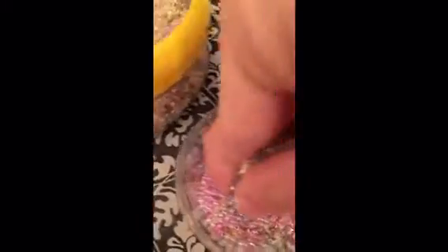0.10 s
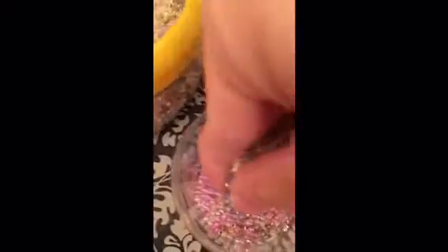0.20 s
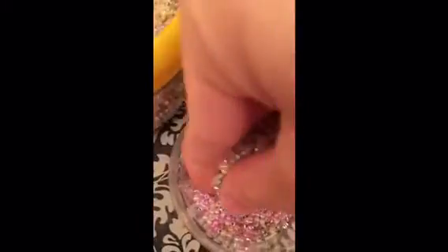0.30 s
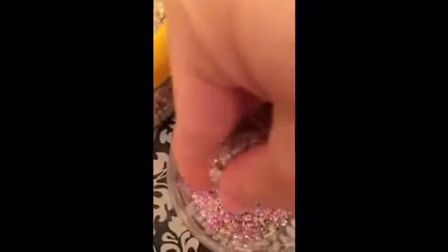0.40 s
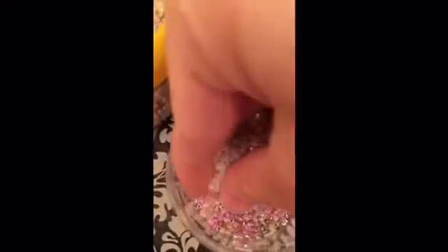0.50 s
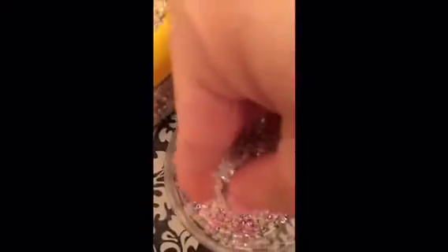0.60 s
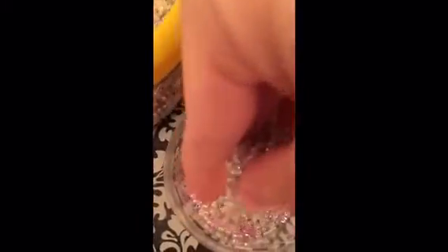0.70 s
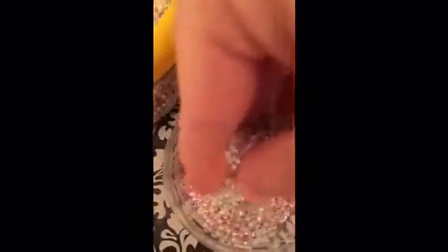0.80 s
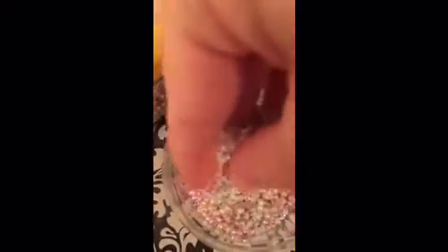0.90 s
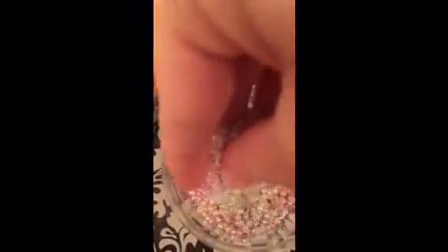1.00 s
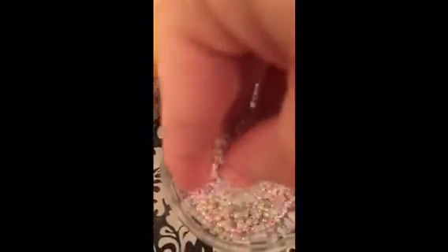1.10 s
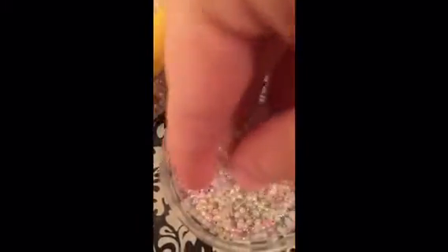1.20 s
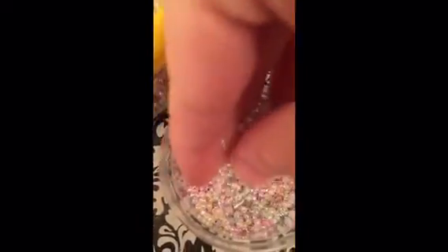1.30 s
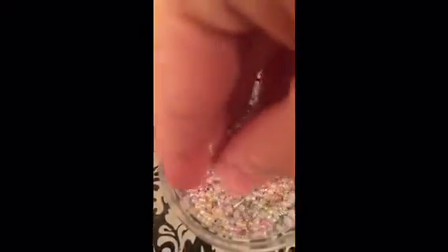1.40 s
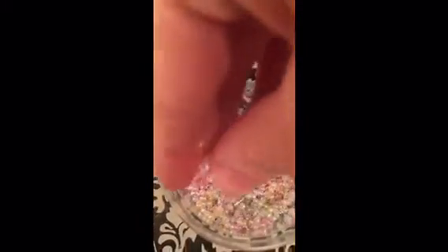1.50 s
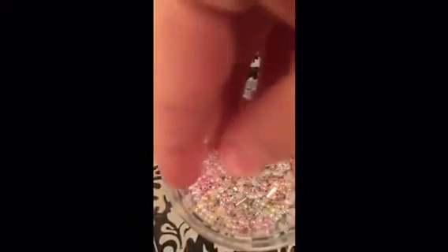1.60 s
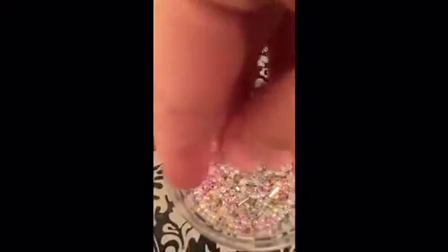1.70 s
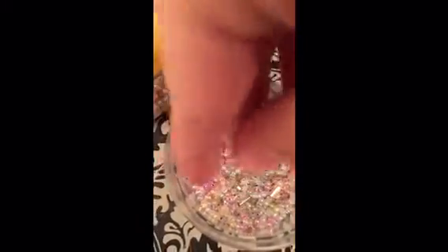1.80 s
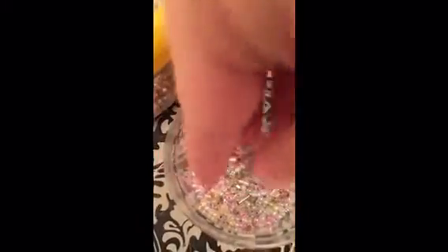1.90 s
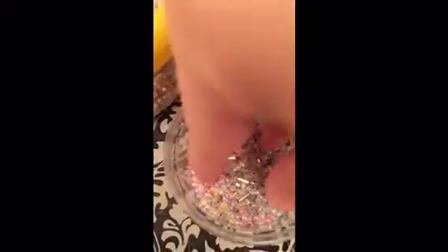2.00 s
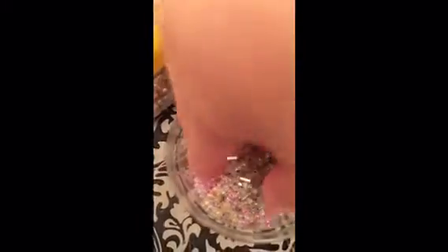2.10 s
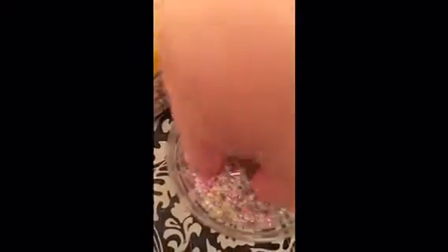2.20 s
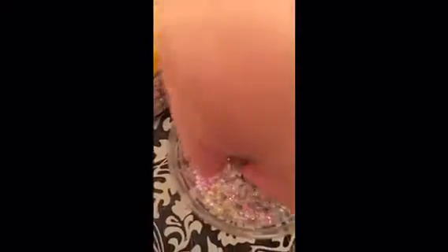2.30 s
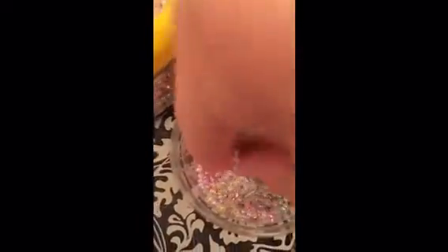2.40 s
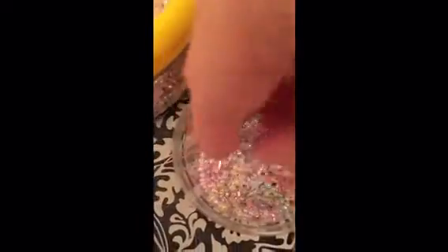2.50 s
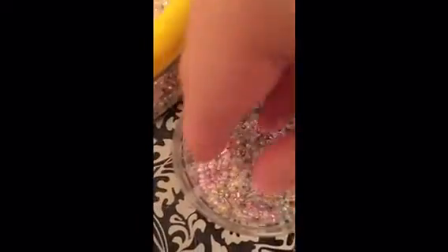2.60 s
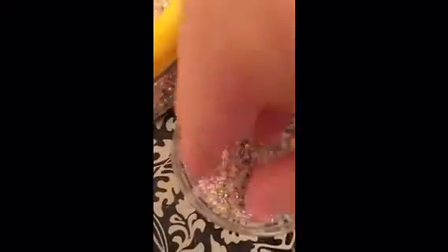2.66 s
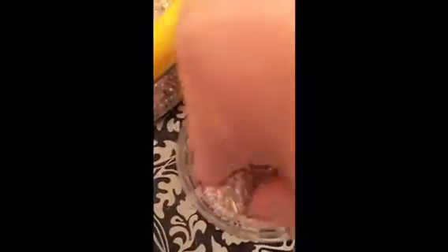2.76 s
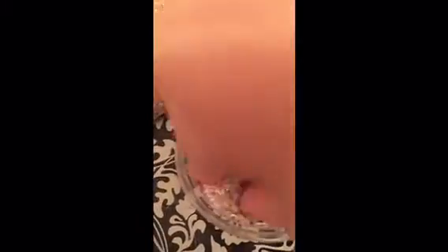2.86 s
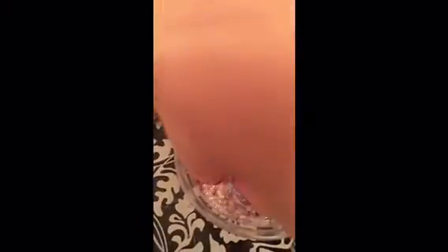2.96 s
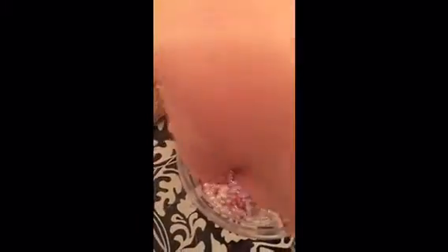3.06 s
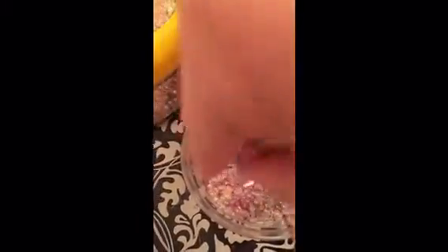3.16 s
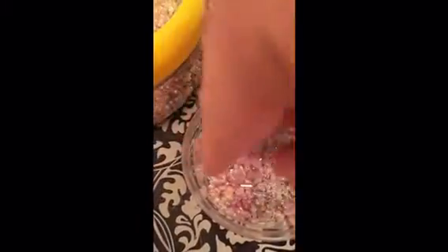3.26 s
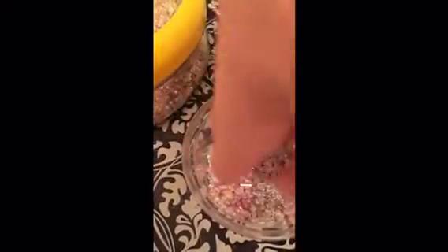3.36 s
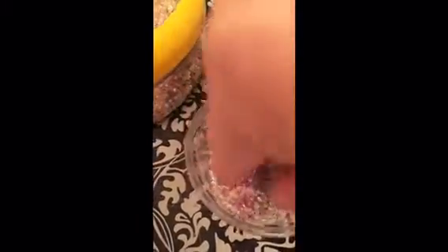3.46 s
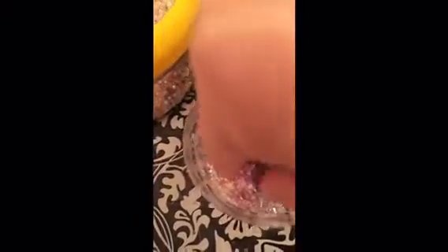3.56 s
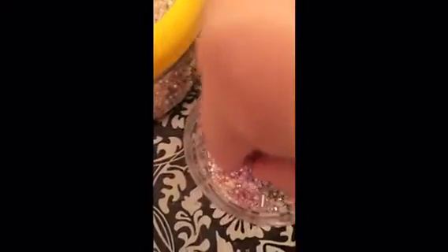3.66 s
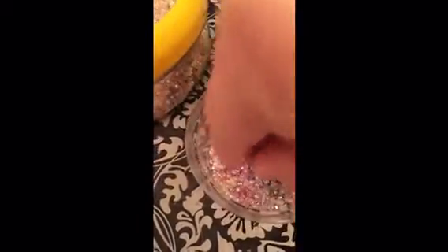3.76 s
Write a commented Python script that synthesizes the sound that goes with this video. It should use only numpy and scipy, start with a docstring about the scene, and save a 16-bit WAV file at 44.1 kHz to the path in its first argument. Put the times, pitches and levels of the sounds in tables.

```python
"""Small plastic beads, played with by fingers in a glass bowl, close by, in a quiet room.
Pinches of beads trickle back onto the heap; then the fingers dig in and stir: many random collisions.
Each dig adds scuffed skin (fading noise) and grinding beads; single beads click on glass and beads.
Short damped modes ring the bowl, a noise tail gives the walls; shaped noise and wavering tones hum below."""
import sys
import numpy as np
from scipy import signal
from scipy.fft import rfft, irfft
from scipy.io import wavfile
from scipy.ndimage import uniform_filter1d, minimum_filter1d

SR = 44100
rng = np.random.default_rng(int(sys.argv[2]) if len(sys.argv) > 2 else 0)


def put_to_file(sound):
    """Save the sound as 16-bit audio at rate SR, in the file named by the first command-line argument."""
    columns = np.atleast_2d(sound).T  # one column per channel
    safe = np.clip(columns, -1, 1)
    whole_steps = np.round(safe * 32767)
    wavfile.write(sys.argv[1], SR, whole_steps.astype(np.int16))


N = 169785


def amp(db):
    """Decibels to gain."""
    return 10 ** (np.asarray(db) / 20)


def unit(x):
    """Scales to energy 1."""
    return x / np.sqrt(np.sum(x ** 2) + 1e-20)


def along(points):
    """A time curve at every sample."""
    return np.interp(np.arange(N) / SR, *np.transpose(points))


def read(points, hz):
    """A spectrum interpolated on a log-frequency axis."""
    point_hz, level_db = np.transpose(points)
    return np.interp(np.log(hz + 1), np.log(point_hz), level_db)


def add(mix, start_s, sound):
    """Mixes a sound in at a time."""
    part = mix[max(round(start_s * SR), 0):][:len(sound)]
    part += sound[:len(part)]


def coloured(x, colour, treble_db=0, size=2048):
    """Causal filter with this spectrum and a treble shelf, keeping the power of white noise."""
    hz = abs(np.fft.fftfreq(size, 1 / SR))
    shelf_db = treble_db / (1 + (5000 / (hz + 1)) ** 4)
    log_gain = np.log(amp(read(colour, hz) + shelf_db))
    # minimum phase from the log gain
    taps = np.fft.ifft(np.exp(np.conj(signal.hilbert(log_gain)))).real
    return signal.oaconvolve(x, unit(taps[:size // 2]))[:len(x)]


CONTACT_S, RING_S, HEAP_S = 0.00014, 0.0004, 0.003  # 1/e decay times
RING_DB, HEAP_DB = -0.5, -5  # ring relative to contact, heap rattle relative to hit


def bead(colour, treble_db=0, vary_db=3, rebound_s=.0016, rebound_db=-7, size=900, count=5):
    """One collision: sharp contact, brief ring, quick rebound, neighbours' rattle; brightness varies."""
    t = np.arange(size) / SR
    contact, heap = rng.standard_normal((2, size))
    hz = rng.uniform(1870, 15300, (count, 1))
    sign = rng.choice([-1, 1], (count, 1))
    ring = (np.cos(2 * np.pi * hz * t) * np.exp(-t / RING_S) * sign).sum(0)
    hit = unit(contact * np.exp(-t / CONTACT_S)) + amp(RING_DB) * unit(ring)
    add(hit, rebound_s * rng.random(), amp(rebound_db) * hit)  # rebound_s is the longest delay
    rattle = unit(heap * np.exp(-t / HEAP_S))
    hit = unit(hit) + amp(HEAP_DB) * rattle
    return unit(coloured(hit, colour, treble_db + vary_db * rng.uniform(-0.86, 1)))


NEW_BEADS_PER_S = 40
FULL_DB = -27  # curve level at which collisions come at per_s


def collisions(curve, colour, per_s, spread_db, crowding=.45, even_s=0.079, count=32):
    """Random collisions of many beads; with crowding, louder means denser."""
    level_db, t = along(curve), np.arange(N) / SR
    chance = rng.random(N)
    size = np.minimum(rng.exponential(1, N), 3)
    # the beads in contact slowly change, and the colour with them
    kind = rng.integers(0, count // 3, N)
    kind = (kind + (t * NEW_BEADS_PER_S).astype(int)) % count
    rate_per_s = per_s * amp(crowding * (level_db - FULL_DB))
    train = (chance < rate_per_s / SR) * amp(spread_db * size)
    # even out the local power, then apply the curve
    window = np.exp(-.5 * (np.arange(-SR // 20, SR // 20 + 1) / SR / even_s) ** 2)
    power = abs(signal.oaconvolve(train ** 2, window / window.sum(), "same"))
    train = train / np.sqrt(power + 1e-5)
    train = train * amp(level_db) * (t > curve[0][0]) * (t < curve[-1][0])
    out = np.zeros(N)
    beads = [bead(colour) for _ in range(count)]
    for i in np.flatnonzero(train):
        add(out, i / SR, train[i] * beads[kind[i]])
    return out


# beads trickling onto the heap, before gain: start_s, level_db
TRICKLE_LEVEL = [(0.392, -46), (0.428, -41), (0.436, -24.5), (0.465, -27.5), (0.495, -32.5), (0.525, -27),
                 (0.63, -27.5), (0.79, -26), (0.9, -34), (0.945, -46.5), (0.998, -50), (1.015, -27),
                 (1.06, -22), (1.2, -27.5), (1.305, -33.5), (1.33, -39), (1.4, -42.5), (1.43, -54),
                 (1.48, -53), (1.54, -40), (1.549, -23.5), (1.62, -30.5), (1.66, -41.5), (1.73, -63),
                 (1.89, -47), (1.94, -62)]
# relative spectrum of falling beads: pitch_hz, level_db_per_hz
FALL_SPECTRUM = [(200, -34.5), (700, -32.5), (1200, -14.5), (1650, -11), (2200, -2.5), (2950, -8.5),
                 (3600, -5.5), (5800, -3), (6700, -3), (8800, 2.5), (10400, -3), (15000, -4.5),
                 (17000, -23)]
FALL_PER_S = 1600


def trickle(gain_db=-1.5):
    """Beads slip from the fingers and patter on the heap."""
    return amp(gain_db) * collisions(TRICKLE_LEVEL, FALL_SPECTRUM, FALL_PER_S, spread_db=3.5)


# fingers stirring the heap, before gain: start_s, level_db
STIR_LEVEL = [(2.052, -79), (2.066, -28), (2.082, -28), (2.13, -38.5), (2.195, -49.5), (2.23, -33.5),
              (2.285, -33), (2.34, -41.5), (2.46, -35.5), (2.53, -25.5), (2.6, -37), (2.632, -52),
              (2.678, -45), (2.715, -65), (2.75, -43), (2.792, -52.5), (2.802, -29), (2.82, -21.5),
              (2.84, -34), (2.885, -44), (2.96, -35), (3.06, -30), (3.18, -36), (3.255, -25), (3.32, -41),
              (3.45, -70), (3.485, -46), (3.5, -26), (3.555, -28.5), (3.58, -42.5), (3.635, -47),
              (3.675, -34), (3.74, -46.5), (3.85, -44.5)]
# stirred beads, tight while fingers push, loose as they lift: start_s, click_size_spread_db
STIR_LOOSENESS = [(2.06, 0), (2.56, 7.5), (2.82, 4), (3.05, 7), (3.51, 2), (3.8, 6)]
# relative spectrum of stirred beads: pitch_hz, level_db_per_hz
STIR_SPECTRUM = [(200, -29), (800, -21), (1700, -13.5), (2350, -8), (2900, -10.5), (3500, -7), (4400, -6),
                 (5800, -6), (6600, -0.5), (7200, -2.5), (8000, 2), (9200, 4.5), (10300, -2.5), (15000, 0),
                 (17000, -9)]
STIR_PER_S = 3000
CREEP_FROM_S, CREEP_BEFORE_GAIN_DB = .22, -67


def stir(gain_db=-3.14):
    """Fingers shove the heap with a finer, brighter rustle, over a steady faint creep of beads."""
    shove = collisions(STIR_LEVEL, STIR_SPECTRUM, STIR_PER_S, spread_db=along(STIR_LOOSENESS))
    creep_level = [(CREEP_FROM_S, CREEP_BEFORE_GAIN_DB), (N / SR, CREEP_BEFORE_GAIN_DB)]
    creep = collisions(creep_level, FALL_SPECTRUM, per_s=490, spread_db=-4, crowding=0)
    return amp(gain_db) * (shove + creep)


# fingertips dig into the heap, scuff level before decay: start_s, level_db
FINGER_DIGS = [(2.058, -49), (2.8, -49), (3.493, -53)]
# relative spectrum of beads grinding under pressure: pitch_hz, level_db_per_hz
GRIND_SPECTRUM = [(1000, -15), (2400, -2), (2900, -5), (4100, 5.5), (5600, -5)]


def grind(above_scuff_db=5, fade_db=12, length_s=.3):
    """After each dig the pressed beads grind on each other with a coarse, fuller grain."""
    out = np.zeros(N)
    for start_s, level_db in FINGER_DIGS:
        start_db = level_db + above_scuff_db
        curve = [(start_s, start_db), (start_s + length_s, start_db - fade_db)]
        out += collisions(curve, GRIND_SPECTRUM, per_s=820, spread_db=3.5, crowding=0)
    return out


# relative spectrum of rubbed skin: pitch_hz, level_db_per_hz
SCUFF_SPECTRUM = [(200, -14), (900, -5), (1500, -7.5), (5000, -14)]


def scuffs(attack_s=0.0018, decay_s=0.07):
    """A dull, short rub of skin as the fingers dig in: coloured noise, dying away."""
    out, t = np.zeros(N), np.arange(SR // 2) / SR
    envelope = np.minimum(t / attack_s, 1) * np.exp(-t / decay_s)
    for start_s, level_db in FINGER_DIGS:
        rub = coloured(rng.standard_normal(len(t)), SCUFF_SPECTRUM)
        add(out, start_s, amp(level_db) * rub * envelope)
    return out


# single beads knock on the glass, rms over click_s: start_s, level_db
GLASS_KNOCKS = [(0.2153, -24), (0.3895, -29), (0.392, -15), (0.411, -23), (0.4325, -20), (0.4456, -20),
                (0.4478, -32), (0.4625, -18.5), (0.473, -25), (0.4819, -20.5), (0.5313, -20), (0.5506, -21),
                (0.5871, -23), (0.5977, -22.5), (0.6352, -19.5), (0.7388, -21), (0.8651, -22),
                (0.9774, -19.5), (0.9907, -21), (1.0046, -24.5), (1.0383, -11.5), (1.0607, -36),
                (1.1215, -17), (1.1779, -25), (1.1859, -20.5), (1.2689, -18.5), (1.4728, -23.5),
                (1.4892, -19), (1.5171, -23), (1.5332, -24), (1.6742, -21.5), (1.6926, -23.5),
                (1.8827, -31), (2.3815, -32.5), (2.4713, -30), (2.6464, -27.5), (3.1368, -25)]
# single beads tick on other beads, rms over click_s: start_s, level_db
BEAD_TICKS = [(0.2228, -31), (0.307, -46.5), (0.4206, -30), (0.5584, -21), (0.6711, -22), (0.8942, -22.5),
              (0.9071, -21), (0.9649, -28.5), (1.2014, -24), (1.3038, -21), (1.3079, -26), (1.3136, -21),
              (1.3464, -27), (1.3637, -25), (1.3863, -24), (1.4149, -35.5), (1.4429, -32), (1.4993, -26),
              (1.5953, -17), (1.6027, -28), (1.7094, -37), (1.7598, -23), (1.7925, -36), (1.8302, -45),
              (1.8593, -32), (1.8803, -19), (1.9093, -37), (1.9264, -41), (1.9823, -48.5), (2.0806, -21),
              (2.4155, -30.5), (2.4926, -27), (2.527, -21), (2.6512, -27), (2.6846, -23.5), (2.7344, -28),
              (3.2823, -25.5), (3.3332, -29), (3.3411, -29.5), (3.3626, -38.5), (3.4004, -34)]


def clicks(knock_treble_db=-3, tick_treble_db=5, click_s=0.002):
    """Single beads land hard: fuller on the glass, thinner and brighter on other beads."""
    out = np.zeros(N)
    for table, treble_db in (GLASS_KNOCKS, knock_treble_db), (BEAD_TICKS, tick_treble_db):
        for start_s, level_db in table:
            click = np.sqrt(click_s * SR) * bead(FALL_SPECTRUM, treble_db)
            add(out, start_s, amp(level_db) * click)
    return out


# bowl modes, damped by the load: pitch_hz, energy_level_db, t60_s
BOWL_MODES = [(2390, -34.5, 0.021), (2570, -33, 0.04), (3450, -27, 0.0067), (4410, -37, 0.045),
              (6570, -20.5, 0.0099), (9340, -24.5, 0.044)]


def bowl(x):
    """The glass rings briefly under the beads: decaying modes driven by their sound."""
    t = np.arange(SR // 5) / SR
    ring = np.zeros(len(t))
    for pitch_hz, level_db, t60_s in BOWL_MODES:
        mode = np.cos(2 * np.pi * pitch_hz * t) * amp(-60 * t / t60_s)
        ring += amp(level_db) * unit(mode)
    return signal.oaconvolve(x, ring)[:N]


ROOM_T60_S, ROOM_DB = 0.23, -28.5  # tail energy relative to direct sound


def room(x):
    """A faint, short tail from the walls: decaying noise after a 4 ms gap."""
    t = np.arange(SR // 2) / SR
    tail = rng.standard_normal(len(t)) * amp(-60 * t / ROOM_T60_S) * (t > .004)
    return amp(ROOM_DB) * signal.oaconvolve(x, unit(tail))[:N]


# relative spectrum of room rumble: pitch_hz, level_db_per_hz
RUMBLE_SPECTRUM = [(20, -10), (40, -1.5), (70, 3.5), (100, -1.5), (135, 1.5), (170, -10.5), (290, -9),
                   (430, -20.5), (680, -21.5), (850, -27.5), (2200, -31.5), (3000, -39), (15000, -52)]
RUMBLE_RMS_DB = -51
# appliance hums and a faint whine: pitch_hz, level_rms_db, waver_rms_hz
HUM_TONES = [(70.7, -56, 3.11), (121.5, -61, 1.85), (2055, -79, 28.7)]


def background():
    """Low room rumble of shaped noise, with hums and a faint whine whose pitch drifts at random."""
    gain = amp(read(RUMBLE_SPECTRUM, np.fft.rfftfreq(N, 1 / SR)))
    rumble = irfft(rfft(rng.standard_normal(N)) * gain, N)
    out = amp(RUMBLE_RMS_DB) * np.sqrt(N) * unit(rumble)
    for pitch_hz, level_db, waver_hz in HUM_TONES:
        smooth = uniform_filter1d(rng.standard_normal(N), size=round(SR / np.sqrt(2 * pitch_hz)))
        drift = np.sqrt(N) * unit(smooth)  # rms 1
        phase = 2 * np.pi * np.cumsum(pitch_hz + waver_hz * drift) / SR
        out = out + amp(level_db) * np.sqrt(2) * np.sin(phase)
    return out


def scene():
    """Beads, bowl and room together."""
    beads = trickle() + stir() + grind() + scuffs() + clicks()
    beads = beads + bowl(beads)
    return (beads + room(beads) + background())[None]


CEILING_DB, EDGE_HZ = -5.7, 15300


def record(dry):
    """A limiter holds the sharpest clicks; then a low-pass sets the band limit."""
    headroom = np.minimum(amp(CEILING_DB) / (abs(dry) + 1e-9), 1)
    limited = dry * uniform_filter1d(minimum_filter1d(headroom, size=21), size=21)
    lowpass = signal.firwin(1023, EDGE_HZ, window=("kaiser", 7), fs=SR)
    return signal.oaconvolve(limited, lowpass[None], "same")


dry = scene()
out = record(dry)
put_to_file(out)
```